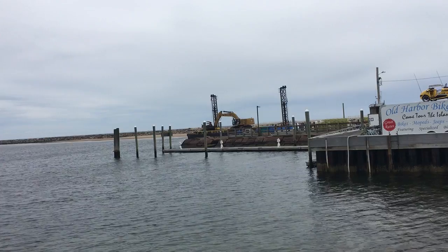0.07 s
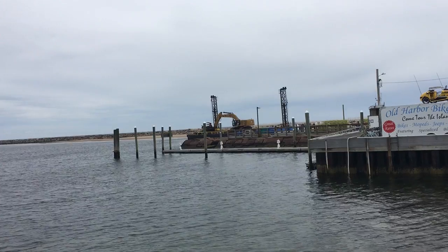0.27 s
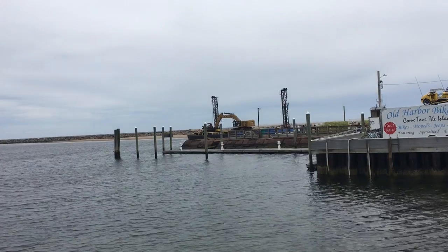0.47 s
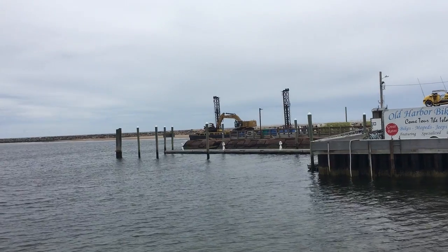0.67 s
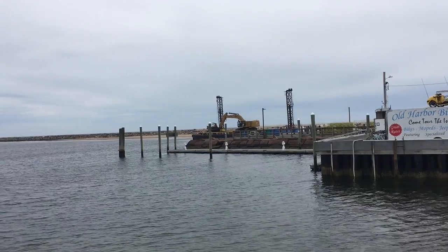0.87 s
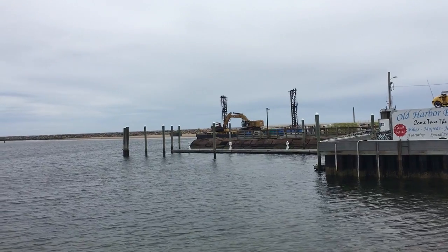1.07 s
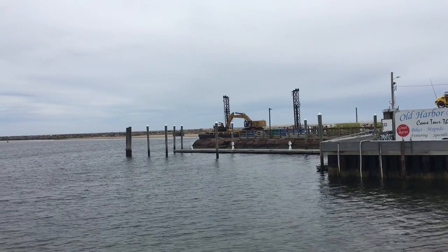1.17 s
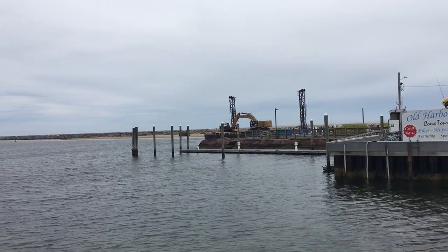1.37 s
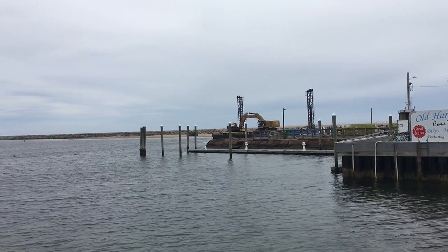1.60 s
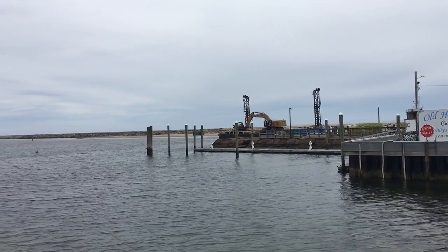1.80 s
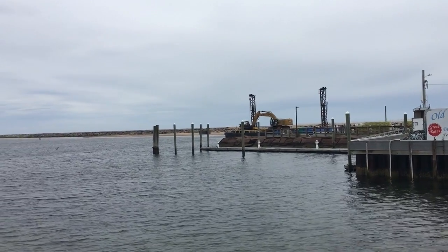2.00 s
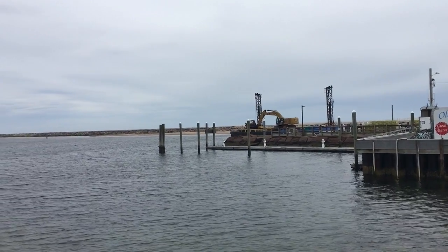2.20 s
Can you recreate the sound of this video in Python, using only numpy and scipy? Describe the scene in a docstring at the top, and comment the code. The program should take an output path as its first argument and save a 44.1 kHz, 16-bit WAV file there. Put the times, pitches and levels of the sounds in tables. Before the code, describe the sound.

A distant horn holds one steady note across a harbor, breaks off briefly with an echo, and sounds again. Gusts of wind rumble on the microphone and die down over the faint hiss of rippling water.

```python
"""A distant horn holds one note across a harbour while gusts of wind rumble on the microphone.
The horn, four pure tones with a fluttering echo from the shore, breaks off briefly and sounds again.
The gusts, swirls of air made from bands of noise, die down over the hiss of rippling water.
Two faint bird chirps, a far whine and one light knock on the microphone come in between."""
import sys
import numpy as np
from scipy import signal
from scipy.fft import rfft, irfft
from scipy.io import wavfile

SR = 44100
rng = np.random.default_rng(int(sys.argv[2]) if len(sys.argv) > 2 else 0)


def dump(signal):
    """Clip the signal to [-1, 1] and save it as 16-bit WAV at the path in sys.argv[1]."""
    limited = np.clip(np.atleast_2d(signal).T, -1, 1)
    pcm = np.round(limited * 32767).astype(np.int16)
    wavfile.write(sys.argv[1], SR, pcm)


N = 99225
T, HZ = np.arange(N) / SR, np.fft.rfftfreq(N, 1 / SR)


def amp(db):
    """Turns decibels into a factor to multiply by."""
    return 10 ** (np.asarray(db) / 20)


def unit(x):
    """Scales a signal to an average (rms) size of 1."""
    return x / np.sqrt(np.mean(abs(x) ** 2) + 1e-20)


def curves(table):
    """Joins the rows of a time table with straight lines: one curve for each column after the time."""
    times, *columns = np.transpose(table)
    return [np.interp(T, times, column) for column in columns]


def colour(points):
    """Gain at every frequency, from rows of f/Hz, level/dB."""
    hz, db = np.transpose(points)
    return amp(np.interp(np.log(HZ + 1), np.log(hz), db))


def shaped(x, gain):
    """Filters a signal with one gain per frequency, then scales it to size 1."""
    return unit(irfft(rfft(x) * gain, N))


def noise(gain):
    """Noise with the given balance of frequencies."""
    return shaped(rng.standard_normal(N), gain)


def band(low_hz, high_hz, order=4):
    """Gain that keeps one range of frequencies; a higher order gives steeper edges."""
    return 1 / np.sqrt((1 + (low_hz / (HZ + 1e-3)) ** (2 * order)) * (1 + (HZ / high_hz) ** (2 * order)))


def drift(rate_hz):
    """Smooth random wandering, up to about the given rate."""
    return noise(1 / (1 + (HZ / rate_hz) ** 4))


def fuzzy_tone(hz, width_hz):
    """A whistle smeared by distance into a narrow band of noise around its pitch."""
    phase = 2 * np.pi * np.cumsum(hz) / SR
    return drift(width_hz) * np.sin(phase) + drift(width_hz) * np.cos(phase)


def fizz():
    """A very faint, high hiss that stops early on."""
    end_s = .42
    return amp(-74.5) * np.clip((end_s - T) / .01, 0, 1) * noise(band(6950, 13000, order=2))


def water():
    """Ripples make a patchy hiss, and fine spray ticks in its treble."""
    # tone colour of the ripples: f/Hz, relative level/dB
    ripple_colour = [(100, 6.5), (250, 1.5), (400, 6.5), (580, -0.5), (900, 0.5), (1300, -0.5), (1750, -4),
                     (2400, -8.5), (3300, -17), (4800, -20.5), (5800, -20), (6800, -23), (7700, -29),
                     (9600, -32.5), (10400, -38.5), (12000, -36.5), (16000, -42.5)]
    # loudness of the ripples: t/s, body level/dB, treble level/dB
    ripple_levels = [(.1, -48.5, -48), (.38, -51.5, -50), (.5, -51, -51.5), (.8, -49, -49.5),
                     (1.2, -49.5, -50.5), (1.4, -49, -48), (1.55, -48, -45), (1.85, -48.5, -48),
                     (2.05, -49.5, -49.5), (2.25, -48, -48)]
    treble_hz, flicker_db, drops_per_s = 3500, 0.99, 200
    body_db, treble_db = curves(ripple_levels)
    spectrum, ripples = rfft(noise(colour(ripple_colour))), np.zeros(N)
    edges = np.geomspace(100, SR / 2, 15)
    for low, high in zip(edges, edges[1:]):  # each band flickers on its own
        treble_share = 1 / (1 + (treble_hz / high) ** 4)
        db = body_db + treble_share * (treble_db - body_db) + flicker_db * drift(19)
        ripples += irfft(spectrum * (HZ >= low) * (HZ < high), N) * amp(db)
    drops = rng.random(N) < drops_per_s / SR
    sizes = amp(3.5 * np.minimum(rng.exponential(1, N), 2))
    spray = shaped(drops * sizes, band(4500, 12000, order=2))
    return ripples + spray * amp(treble_db - 32)


def whine():
    """A faint, far-off tone that wavers just above the sound of the water."""
    # path of the whine: t/s, f/Hz, level/dB
    path = [(1.5, 1797, -65), (1.54, 1790, -51), (1.57, 1809, -59.5), (1.66, 1743, -56.5),
            (1.73, 1597, -57.5), (1.8, 1704, -58), (1.9, 1770, -71.5)]
    hz, db = curves(path)
    return amp(db) * fuzzy_tone(hz, width_hz=110)


def birds():
    """Short whistles that rise and fall, smeared by reflections across the water."""
    # bird calls: t/s, length/s, top f/Hz, level/dB
    chirps = [(0.437, 0.044, 3387, -62.5), (2.147, 0.0387, 4640, -62)]
    pitch_bend, tail_s = 0.092, 0.084
    calls = np.zeros(N)
    for start, length, top_hz, db in chirps:
        arch = np.sin(np.pi * np.clip((T - start) / length, 0, 1))
        hz = top_hz * (1 - pitch_bend * (1 - arch))
        calls += amp(db) * arch * fuzzy_tone(hz, width_hz=200)
    tail = rng.standard_normal(N) * amp(-60 * T / tail_s)
    return signal.fftconvolve(calls, tail / np.linalg.norm(tail))[:N]


def knock():
    """A light knock on the microphone's case: a dry double tick and a low thump."""
    # the two contacts: t/s, level/dB
    contacts = [(1.3114, -43), (1.3136, -47)]
    # tone colour of the tick: f/Hz, relative level/dB
    tick_colour = [(300, -4), (1500, 9), (2500, 0), (3500, 0), (6000, 1.5), (9000, -11.5), (12000, -16),
                   (16000, -25)]
    decay_s, thump_s, thump_hz = 0.0017, 0.0056, 124
    loudness = sum(amp(db) * (T >= t) * np.exp(-abs(T - t) / decay_s) for t, db in contacts)
    since = T - contacts[-1][0]
    thump = amp(-23.5) * np.exp(-(since / thump_s) ** 2) * np.cos(2 * np.pi * thump_hz * since)
    return loudness * noise(colour(tick_colour)) - thump


def wind():
    """Air swirls at the microphone: each gust swells the rumble, and sharp ones drive small swirls."""
    # steady push of the wind: t/s, level/dB
    breeze = [(.08, -37), (.14, -27), (.28, -28), (.45, -24), (.56, -31.5), (.7, -36), (.88, -37.5),
              (.97, -30), (1.12, -27.5), (1.2, -42.5), (1.4, -38.5), (1.58, -40), (1.7, -43.5), (1.88, -45),
              (2.05, -37.5), (2.25, -48)]
    # single gusts: peak t/s, length/s, level/dB, brightness/(dB per octave)
    gusts = [(0.137, 0.054, -24.5, -3.5), (0.156, 0.014, -16.5, -0.5), (0.177, 0.027, -17.5, 5),
             (0.245, 0.012, -16, 2), (0.315, 0.021, -14.5, 3.5), (0.333, 0.015, -13.5, 5.5),
             (.365, 0.045, -20.5, 3.5), (0.409, 0.033, -17, -0.5), (0.455, 0.047, -19, -4.5),
             (.543, 0.018, -16.5, -0.5), (0.606, 0.048, -25, -6), (0.653, 0.023, -22, -6.5),
             (0.726, 0.015, -23, 4), (.76, 0.012, -26.5, -4), (0.82, 0.021, -27, 1.5),
             (.95, 0.021, -23, -4.5), (0.993, 0.018, -25, -6.5), (1.09, 0.014, -17, 1),
             (1.106, 0.021, -16.5, -5), (1.148, 0.016, -32, -11.5), (1.241, 0.017, -40, -10.5),
             (1.675, 0.02, -31.5, -5), (1.803, 0.0086, -33.5, -6.5), (1.977, 0.014, -23.5, 0.5)]
    # swirls, large to small: low f/Hz, high f/Hz, level/dB at reference_db, growth/(dB per dB of wind)
    swirls = [(27, 74, -43.5, 1.85), (46.3, 74.6, -28.5, 0.76), (74.4, 130, -31, 1.22),
              (120, 172.7, -32.5, 1.44), (227, 282, -43, 1.82), (367, 480, -57.5, 1.78),
              (560, 850, -64.5, 1.32)]
    reference_db, pivot_hz, evenness = -23.5, 113, 0.71
    breeze_power = amp(curves(breeze)[0]) ** 2
    rumble = np.zeros(N)
    for low, high, db, growth in swirls:
        octaves = np.log2(np.sqrt(low * high) / pivot_hz)
        power = breeze_power.copy()
        for peak, length, gust_db, brightness in gusts:
            bump = np.exp(-(2 * (T - peak) / length) ** 2)
            power += amp(gust_db + brightness * octaves / growth) ** 2 * bump
        raw = signal.hilbert(noise(band(low, high, order=5)))  # abs(raw) follows the noise's loudness
        evened = raw.real / (abs(raw) + 0.19) ** evenness
        swirl = shaped(evened, band(low / 2, high * 1.83))
        rumble += swirl * amp(db + growth * (10 * np.log10(power) - reference_db))
    return irfft(rfft(rumble) * band(40, SR / 2, order=5), N)  # trim the deepest bass


def horn():
    """Four harmonics (multiples of one pitch) in long blasts; an echo from the shore hangs on."""
    # horn blasts: start t/s, end t/s, f/Hz
    blasts = [(0, 1.364, 396.8), (1.565, 2.4, 396.3)]
    # moving air fades each harmonic on its own: t/s, then level/dB of harmonics 1 to 4
    harmonic_levels = [(.1, -35.5, -55, -56.5, -72.5), (.28, -36.5, -48, -51.5, -69),
                       (.45, -36, -52.5, -55.5, -73), (.58, -34.5, -47.5, -66.5, -67.5),
                       (.85, -35, -44, -58.5, -65.5), (1.05, -34.5, -47.5, -54.5, -78.5),
                       (1.35, -36.5, -47.5, -61.5, -75), (1.6, -36, -55.5, -65.5, -75),
                       (1.97, -33.5, -53.5, -66.5, -63.5), (2.25, -38.5, -49.5, -61, -70)]
    attack_s, release_s, waver_hz = 0.018, .016, 0.28
    echo_db, echo_s, flutter_hz = -11.5, 4.4, 18
    out = np.zeros(N)
    for start, end, pitch in blasts:
        phase = 2 * np.pi * np.cumsum(pitch + waver_hz * drift(4.3)) / SR
        rise = np.clip((T - start) / attack_s, 0, 1)
        since_end = np.maximum(T - end, 0)
        direct = rise * np.exp(-since_end / release_s)
        echo = rise * amp(echo_db - 60 * since_end / echo_s)
        for k, db in enumerate(curves(harmonic_levels), 1):
            flutter = (drift(flutter_hz) + 1j * drift(flutter_hz)) / np.sqrt(2)  # random size and phase
            strength = direct + echo * flutter * (1 - 0.74 * direct)  # less echo during the blast
            tone = np.exp(1j * (k * phase + 2 * np.pi * rng.random()))
            out += np.sqrt(2) * amp(db) * (strength * tone).real
    return out


def scene():
    """Adds horn, wind, water and the small sounds into one channel."""
    return (horn() + wind() + water() + fizz() + birds() + whine() + knock())[None]


def record(dry):
    """Lets the sound in after a moment of silence and removes the very highest treble."""
    start_s, top_hz = .083, 15900
    fade_in = np.clip((T - start_s) / 0.0018, 0, 1)
    low_pass = signal.firwin(511, top_hz, window=("kaiser", 9), fs=SR)
    return signal.oaconvolve(dry * fade_in, low_pass[None], "same")


dry = scene()
out = record(dry)
dump(out)
```